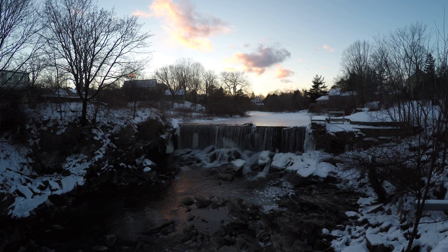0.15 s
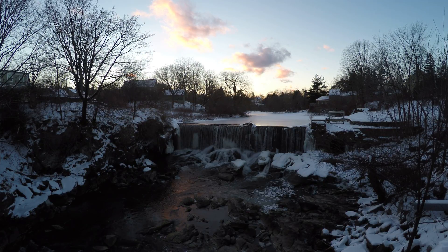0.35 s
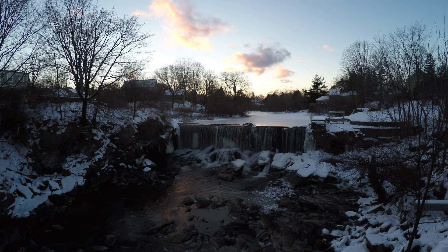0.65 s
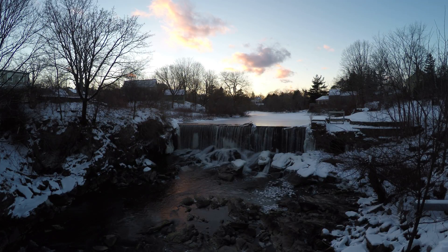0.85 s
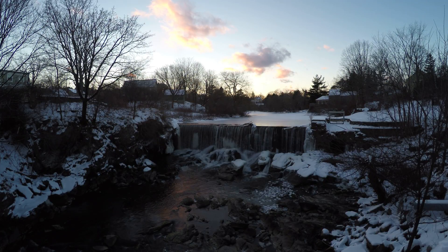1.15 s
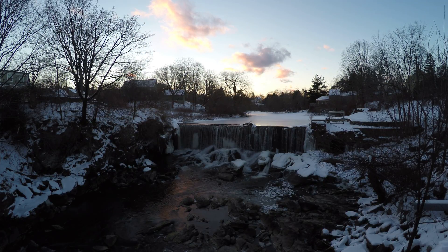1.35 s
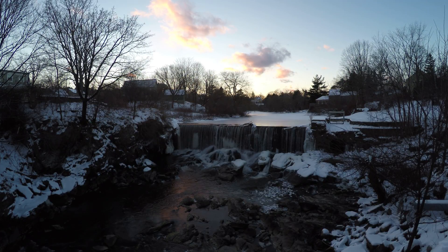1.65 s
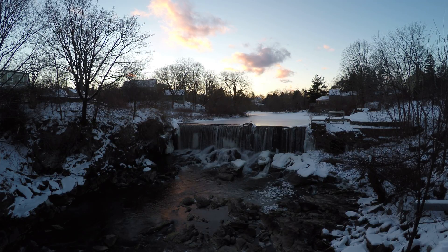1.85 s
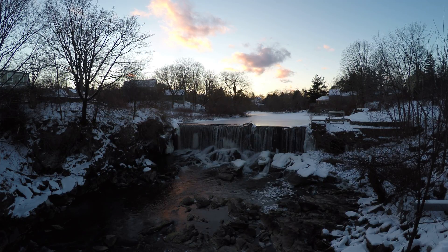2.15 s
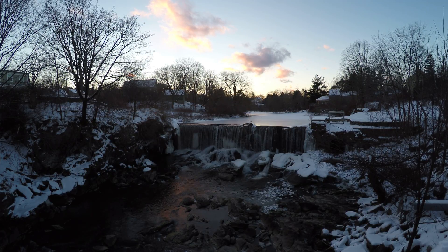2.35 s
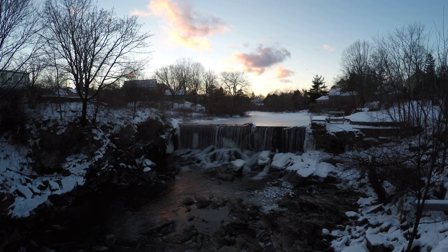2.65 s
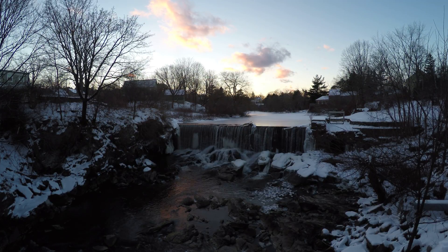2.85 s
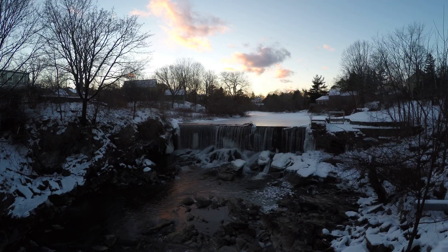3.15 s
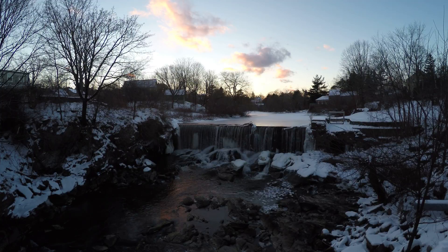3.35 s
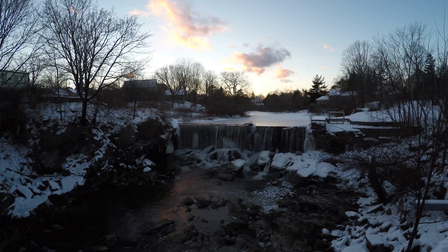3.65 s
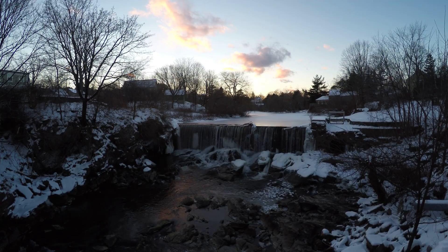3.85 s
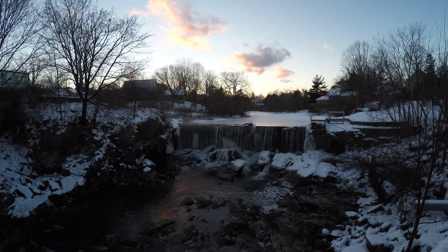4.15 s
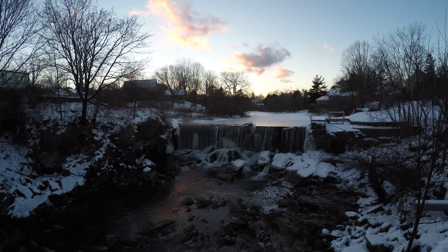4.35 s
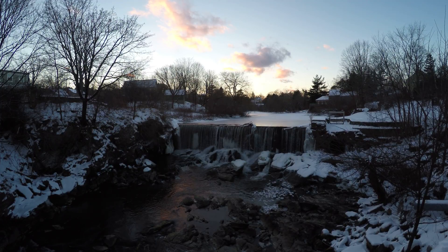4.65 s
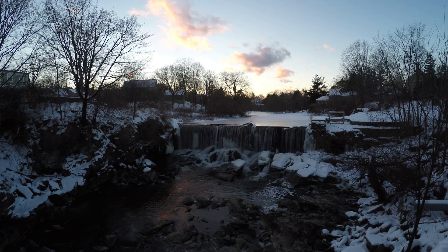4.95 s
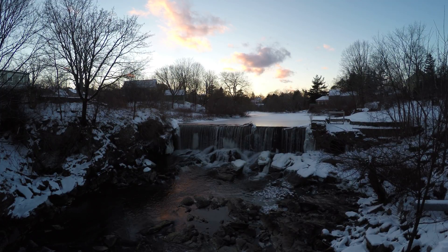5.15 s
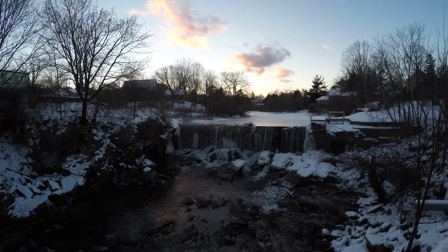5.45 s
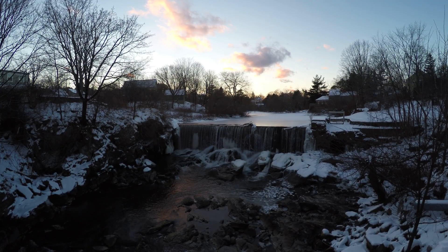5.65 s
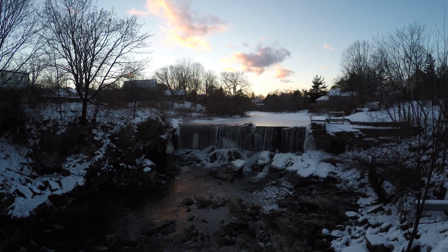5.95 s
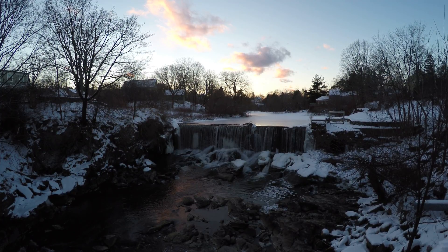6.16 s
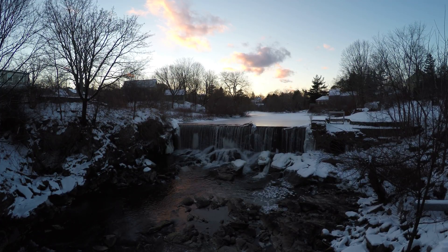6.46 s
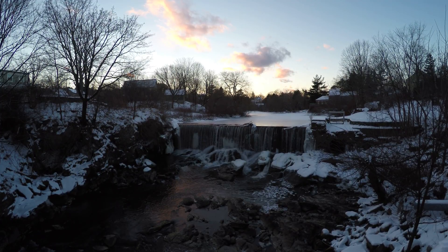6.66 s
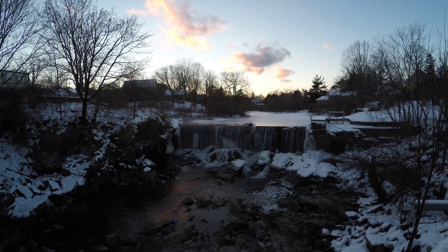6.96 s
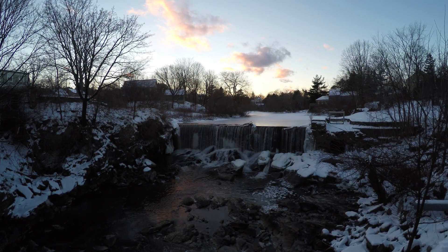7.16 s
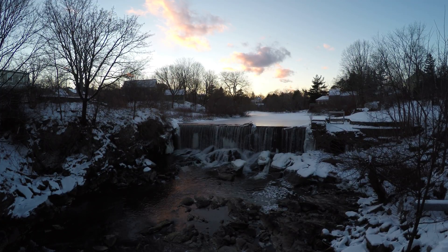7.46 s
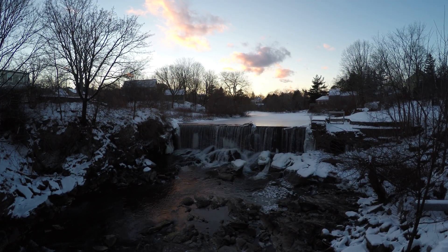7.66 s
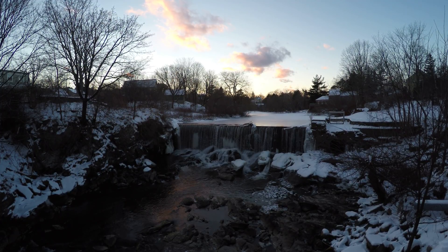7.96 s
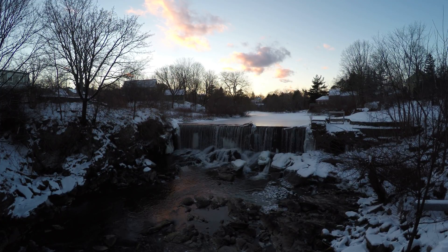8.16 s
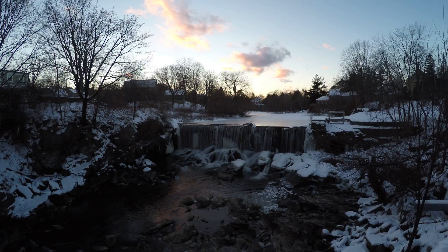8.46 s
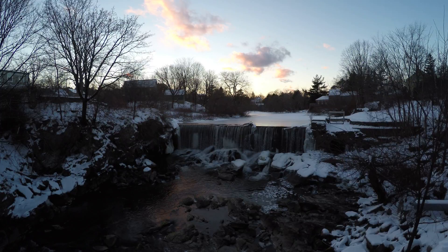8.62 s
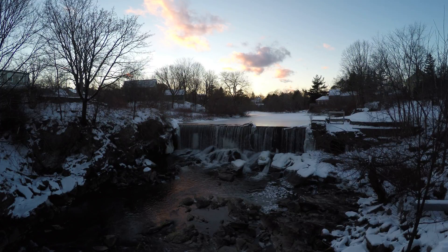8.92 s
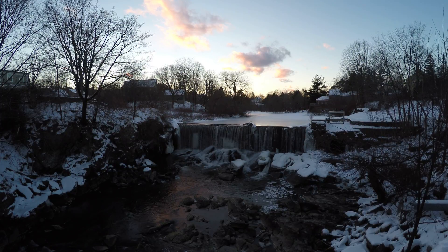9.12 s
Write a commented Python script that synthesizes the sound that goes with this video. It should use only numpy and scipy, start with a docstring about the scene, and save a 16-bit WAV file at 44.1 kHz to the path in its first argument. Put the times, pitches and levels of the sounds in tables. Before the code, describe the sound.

Smooth, constant roar of falling water outdoors; after a calm start, gusts push low, lumpy rumbling and dull thuds over it.

```python
"""On a riverbank, a river pours over a low dam onto rocks some way off: bubbles and splashes merge in a smooth roar.
The roar is shaped noise whose bands waver one by one. A breeze rises after a calm and buffets the single
microphone: low noise swells in lumps, smaller eddies burst over it, and push-pull pulses make deep single thumps.
Slices of the treble flicker apart between the ears now and then: short noise bands, opposite in the two channels."""
import sys
import numpy as np
from scipy import signal
from scipy.fft import rfft, irfft
from scipy.io import wavfile
from scipy.ndimage import uniform_filter1d

SR = 44100
rng = np.random.default_rng(int(sys.argv[2]) if len(sys.argv) > 2 else 0)


def master_out(mix):
    """Clip the mix to full scale and print it as 16-bit PCM to the path in sys.argv[1]."""
    frames = np.transpose(np.atleast_2d(mix))
    ceiling = np.clip(frames, -1, 1)
    pcm = np.round(ceiling * 32767).astype(np.int16)
    wavfile.write(sys.argv[1], SR, pcm)


def boost_factor(decibels):
    """Convert a level in decibels to a linear amplitude factor."""
    exponent = np.asarray(decibels, float) / 20
    return 10 ** exponent


N = 409688

# All levels stand ahead of the final rounding in record().
# The fall as it arrives: start_s, roar_db, spray_db (over its usual share)
FALL_LEVELS = [(0.0, -25, -0.5), (0.13, -25.5, -1), (1.42, -25, -0.2), (2.7, -25.5, 0), (3.7, -26, 0),
               (4.6, -25.5, -0.5), (5.25, -25.7, -0.6), (5.8, -25, -0.5), (7.0, -25.5, 0.2),
               (7.86, -25, -0.5), (8.4, -25.5, 0), (8.7, -26.5, 0), (8.98, -25.5, 0), (9.29, -24.5, -0.5)]
# Spectrum of the falling water: pitch_hz, density_db (relative, per Hz)
ROAR_SPECTRUM = [(60, 4), (110, 1), (200, -1.5), (310, -1), (450, -3), (650, -3), (900, -4.5), (1200, -4.5),
                 (1600, -6.5), (2300, -7.5), (3600, -8), (5200, -9.5), (6200, -11), (7200, -12.5),
                 (10000, -18.5), (12000, -19), (14000, -22.5), (15500, -25)]
SPRAY_FROM_HZ = 2000   # fine spray fades in over the octave above

# Strength of the breeze on the microphone: start_s, buffeting_db, small_eddies_db (over their usual share)
WIND_LEVELS = [(0.0, -34.5, 4), (0.8, -27.5, -2), (1.3, -33, -3), (1.65, -26.5, 3), (2.1, -16.5, -2),
               (2.5, -18, 1.5), (2.85, -21, -3), (3.4, -16.5, 0), (3.72, -21.5, -3.5), (4.4, -16, -0.5),
               (5.3, -18, -1.5), (5.36, -28, 2), (5.45, -20.5, 0), (6.4, -15.5, -0.5), (6.9, -23.5, 4.5),
               (7.5, -15.5, 0), (8.19, -22.5, 3), (8.45, -13, -2.5), (8.62, -24, 0), (9.29, -19.5, 6)]
# Spectrum of the wind's eddies: pitch_hz, density_db (relative, per Hz)
EDDY_SPECTRUM = [(8, -14), (15, 0.5), (27, 1), (49, 1), (88, -7.5), (120, -14), (160, -17.5), (230, -26),
                 (330, -33), (480, -41.5), (700, -44)]
# Heavy low buffets of large eddies, and slack moments: peak_s, level_db (over the wind), half_length_s
BUFFET_SWELLS = [(0.22, 5.5, .1), (0.33, -7, .05), (0.41, 4, 0.052), (0.52, -3, 0.058), (0.6, -7, .05),
                 (0.72, 7, .05), (0.88, 9.5, 0.081), (1.24, -6, .04), (1.33, -6, .04), (1.39, 8, 0.06),
                 (1.67, 4, .07), (1.83, -7, 0.037), (1.89, -2, 0.048), (2.15, 2, 0.054), (2.3, 4, 0.08),
                 (2.37, 0, .03), (2.63, 7.5, 0.057), (2.7, -2, .04), (2.83, -4, 0.046), (3.02, 7, 0.07),
                 (3.31, -1, 0.037), (3.38, 4.5, 0.055), (3.45, -4, 0.036), (3.57, 6, 0.12),
                 (3.87, 10.5, 0.13), (3.97, -6, 0.054), (4.06, 2.5, 0.047), (4.22, 2, 0.13),
                 (4.4, -3, 0.053), (4.45, -3, .03), (4.53, 8, 0.064), (4.75, 0, .04), (4.88, 9.5, 0.1),
                 (5.02, 8, .07), (5.19, 8.5, 0.06), (5.28, 4, 0.043), (5.56, 1, 0.052), (5.69, 3, 0.065),
                 (5.87, 3.5, 0.067), (5.98, 1, .07), (6.12, 11, 0.035), (6.18, -10, 0.061), (6.25, 0, .07),
                 (6.41, 6, 0.085), (6.6, 4, 0.082), (6.82, 10, 0.056), (6.9, -2, 0.037), (7.02, 10.5, 0.1),
                 (7.22, 10, 0.056), (7.52, 4, 0.07), (7.67, 5, 0.11), (7.88, -3, 0.056), (7.99, 4.5, 0.099),
                 (8.45, 5, 0.028), (8.5, 9, 0.054), (8.56, -3, .04), (8.67, 7.5, 0.12), (8.85, 11, 0.17),
                 (8.99, -6, .035), (9.05, 4, 0.069), (9.17, -9, .04), (9.24, 6, 0.051)]
# Ragged bursts of small eddies: peak_s, level_db (over the wind), edge_db (sharp top), half_length_s
BURST_SWELLS = [(0.73, 9, 6, 0.054), (1.67, 3, 13, 0.05), (1.79, 7, 4, 0.065), (2.2, 1, 10, 0.17),
                (2.35, 4, 10, 0.081), (2.42, 5, 9, 0.055), (2.48, -5, 9, 0.053), (2.58, 10, 11.5, 0.063),
                (2.64, 1, 8, 0.032), (2.76, 18.5, 0, 0.055), (2.92, 10, 2, 0.11), (3.09, 5, 5, 0.086),
                (3.41, 4, 7, 0.065), (3.56, -3, 1, .1), (3.27, 4, 0, .06), (3.91, 7, 4, 0.13),
                (4.1, 0, 2, .07), (4.29, 2, 7, .06), (4.42, 5, 2, .06), (4.55, -2, 11, 0.052),
                (4.75, 6, 8.5, 0.12), (4.88, 0.5, 9.5, 0.051), (4.97, 3, 7.5, 0.068),
                (5.04, 7, 12.5, 0.086), (5.11, -3, 4, 0.04), (6.1, -7, 2, 0.05), (6.46, -2, 6, 0.11),
                (6.58, 6, 2, 0.091), (6.66, 2, 8, 0.049), (6.79, -2, 11, 0.034), (6.92, 7, 10, 0.08),
                (7.09, -1, 8, 0.089), (7.3, 4, 2, 0.067), (7.49, 3, 13, 0.07), (7.67, -6, 4.5, 0.1),
                (7.87, 4, 0, 0.09), (7.99, 3, -2, 0.067), (8.4, 2, 6.5, .05), (8.45, -1, 10.5, 0.057),
                (8.5, 1, 12, 0.03), (8.83, 6, 15, 0.084), (8.92, 6, 6, .06), (9.02, 5, 10, 0.043)]
# Strong single eddies, each one deep thump: centre_s, peak_db, swing_s (roughly, from push to pull)
THUMP_EVENTS = [(0.208, -22, 0.0098), (0.72, -17, 0.0097), (0.869, -16, 0.014), (1.391, -18.5, .01),
                (1.673, -11.5, 0.0063), (2.139, -6.5, 0.007), (2.345, -10, 0.0056), (2.574, -14, .005),
                (2.635, -6.5, 0.0068), (3.037, -11, .009), (3.305, -7.5, 0.0073), (3.865, -7, 0.0093),
                (4.154, -9, 0.0086), (4.268, -7, .007), (4.4, -8, 0.0091), (4.544, -11, 0.015),
                (4.878, -10, 0.014), (5.032, -6.5, 0.0076), (5.183, -11, 0.01), (5.272, -7.5, 0.0096),
                (5.558, -11, 0.011), (5.731, -10, 0.012), (6.107, -8.5, .014), (6.407, -7, 0.0064),
                (6.594, -7, .015), (6.831, -7.5, 0.015), (7.222, -10, 0.0084), (7.502, -12, 0.016),
                (7.67, -6.5, 0.0069), (8.39, -7, 0.0067), (8.502, -5, .014), (8.854, -6, 0.0094),
                (8.923, -7.5, 0.0054)]
LARGE_EDDY_HZ, SMALL_EDDY_HZ, EDGE_HZ = 54.6, 113, 210
TOP_HZ, TOP_GROWTH = 450, 0.38   # above its edge a burst swells further, by this share at the top pitch
SMALL_DB, EDGE_DB = 1.5, 0.5   # usual level of small eddies and of their edge over the spectrum
BUFFET_REACH = 0.26   # share of a buffet's swell that the small eddies follow
HUSH_DB, HUSH_HALF_S = -8, 0.033   # the other large eddies give way around a thump

# Brief widenings of treble slices; the level is that of the lowest slice
FLICKERS_PER_S, FLICKER_S, FLICKER_DB = 5.5, 0.04, -40.5
FLICKER_LOW_HZ, FLICKER_WIDTH_HZ = 4280, 1320


def waterfall(flicker_db=0.02, spray_flicker_db=0.3, surge_db=0.37):
    """Each band of the roar flickers and surges a little by itself; spray wavers most on its way through the air."""
    roar_db, spray_db = in_time(FALL_LEVELS)
    roar = 0
    for hz, band in bands(ROAR_SPECTRUM, count=16):
        spray = rise(hz, SPRAY_FROM_HZ, 2 * SPRAY_FROM_HZ)
        flicker = (flicker_db + spray_flicker_db * spray) * drift(16.0)
        surge = surge_db * drift(1.7)
        roar = roar + band * boost_factor(roar_db + spray * spray_db + flicker + surge)
    return roar


def breeze(flutter_db=2.5, lumps_db=1.8):
    """Large eddies push the membrane with the gusts; small ones flutter together in short ragged bursts."""
    wind_db, share_db = in_time(WIND_LEVELS)
    buffet_db, = swells(BUFFET_SWELLS)
    burst_db, burst_edge_db = swells(BURST_SWELLS)
    hush_db, = swells([(s, HUSH_DB, HUSH_HALF_S) for s, *_ in THUMP_EVENTS])
    flutter = drift(22.0)   # shared by all small eddies
    large_eddies, small_eddies = 0, 0
    for hz, band in bands(EDDY_SPECTRUM, count=11):
        small = rise(hz, LARGE_EDDY_HZ, SMALL_EDDY_HZ)
        edge = rise(hz, SMALL_EDDY_HZ, EDGE_HZ)
        growth = 1 + TOP_GROWTH * rise(hz, EDGE_HZ, TOP_HZ)
        body_db = (1 - edge) * (SMALL_DB + burst_db)
        sharp_db = edge * (EDGE_DB + burst_edge_db * growth)
        colour_db = share_db + BUFFET_REACH * buffet_db + body_db + sharp_db
        gust = boost_factor(colour_db + flutter_db * small * flutter)
        large_eddies = large_eddies + (1 - small) * band
        small_eddies = small_eddies + small * evened(band, span_s=0.087, share=0.73) * gust
    push = boost_factor(buffet_db + hush_db + lumps_db * drift(3.7))
    rumble = push * evened(large_eddies, span_s=0.069, share=0.99)
    return boost_factor(wind_db) * (rumble + small_eddies)


def thumps(spread=1.4):
    """A passing vortex pushes the membrane one way, then pulls it the other."""
    out, t = np.zeros(N), np.arange(N) / SR
    signs = rng.choice([-1, 1], (len(THUMP_EVENTS), 1))
    for (s, peak_db, swing_s), sign in zip(THUMP_EVENTS, signs):
        near = slice(int((s - .1) * SR), int((s + .1) * SR))
        u = (t[near] - s) / swing_s
        shape = u / (1 + (2 * u) ** 2) * np.exp(-(u / spread) ** 2)
        out[near] += sign * boost_factor(peak_db) * shape / np.max(shape)
    return out


def treble_flicker(count=8):
    """Random short pulses open noise slices of the treble, each slice joining only some of the shared moments."""
    out, white, hz = 0, rfft(rng.standard_normal(N)), np.arange(N // 2 + 1) * SR / N
    moments = rng.random(N) < FLICKERS_PER_S / SR
    shape = np.hanning(int(FLICKER_S * SR))
    for k in range(count):
        low_hz = FLICKER_LOW_HZ + k * FLICKER_WIDTH_HZ
        treble_slice = irfft(white * (hz > low_hz) * (hz < low_hz + FLICKER_WIDTH_HZ), N)
        joined = moments * (rng.random(N) < .19)   # chance that this slice takes part
        gate = signal.fftconvolve(joined, shape, "same")
        out = out + rms_one(treble_slice) * gate * boost_factor(FLICKER_DB - 1.1 * k)   # softer slice by slice
    return out


def rms_one(x):
    """Scale to rms 1."""
    return x / np.sqrt(np.mean(x ** 2) + 1e-20)


def in_time(rows):
    """Level columns of a table, drawn as straight lines between its times, one value a sample."""
    s, *columns = np.transpose(rows)
    return [np.interp(np.arange(N) / SR, s, c) for c in columns]


def swells(rows):
    """Each row is a smooth rise and fall in dB around its time; one curve for each level column."""
    out = np.zeros((len(rows[0]) - 2, N))
    for s, *level_db, half_s in rows:
        reach = np.arange(max(int((s - half_s) * SR), 0), min(int((s + half_s) * SR), N))
        bump = np.cos(np.pi / 2 * (reach / SR - s) / half_s) ** 2
        out[:, reach] += np.outer(level_db, bump)
    return out


def drift(rate_hz):
    """Slow chance: noise at every 40th sample through a double one-pole low-pass; rms 1."""
    r = np.exp(-80 * np.pi * rate_hz / SR)
    slow = signal.lfilter([1], [1, -2 * r, r * r], rng.standard_normal(N // 40 + 2002))
    slow = slow[2000:]   # skip the filter's start
    return np.interp(np.arange(N) / 40, np.arange(len(slow)), rms_one(slow))


def bands(spectrum, count):
    """Overlapping bands of one noise, shaped by the spectrum; together they have rms 1. Yields (Hz, sound)."""
    points = np.array(spectrum)
    point_octave = np.log2(points[:, 0])
    octave = np.log2(np.maximum(np.arange(N // 2 + 1) * SR / N, 1))
    density_db = np.interp(octave, point_octave, points[:, 1], -120, -120)
    shaped = rfft(rng.standard_normal(N)) * boost_factor(density_db)
    shaped = shaped / np.sqrt(np.mean(irfft(shaped, N) ** 2))
    centres = np.linspace(point_octave[0], point_octave[-1], count)
    for centre in centres:
        share = np.clip(1 - np.abs(octave - centre) / (centres[1] - centres[0]), 0, 1)
        yield 2 ** centre, irfft(shaped * share, N)


def rise(hz, low_hz, high_hz):
    """0 below the low pitch, 1 above the high one, even in octaves between."""
    return np.clip(np.log(hz / low_hz) / np.log(high_hz / low_hz), 0, 1)


def evened(x, span_s, share):
    """Take a share of the chance swell out of a noise."""
    power = uniform_filter1d(x ** 2, int(span_s * SR)) / np.mean(x ** 2)
    return x / (power + 0.018) ** (np.clip(share, 0, 1) / 2)


def scene():
    """One microphone feeds both channels; the treble flicker has opposite signs in the two."""
    return waterfall() + breeze() + thumps() + treble_flicker() * [[1], [-1]]


def band_limit(x):
    """A steep low-pass at the top of the band."""
    return signal.sosfilt(signal.butter(12, 15290, fs=SR, output="sos"), x)


def record(dry):
    """The strongest buffets are rounded off by a soft curve; quiet sound gains 0.4 dB."""
    mix = 1.26 * np.tanh(dry / 1.204)
    return band_limit(mix)


dry = scene()
out = record(dry)
master_out(out)
```